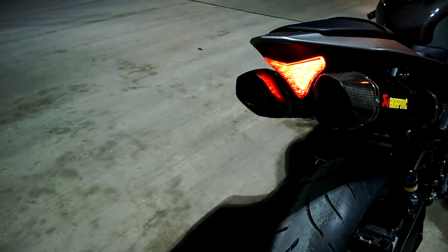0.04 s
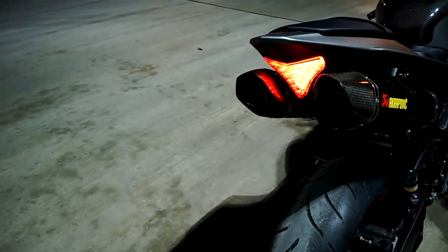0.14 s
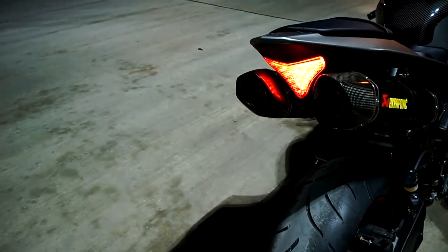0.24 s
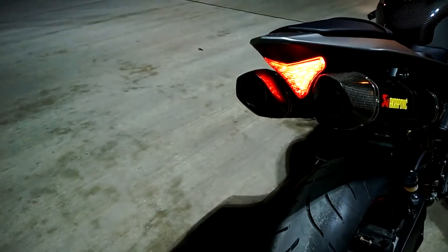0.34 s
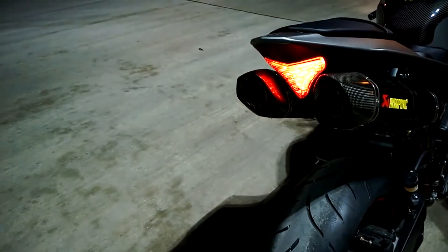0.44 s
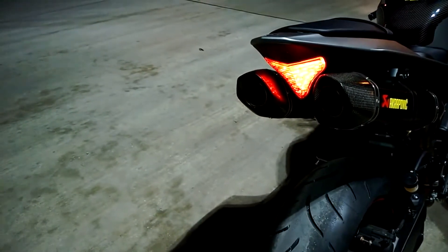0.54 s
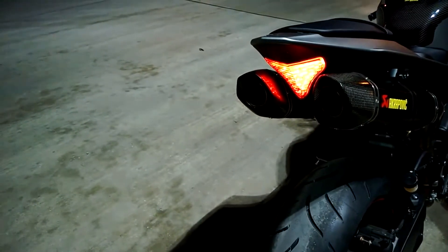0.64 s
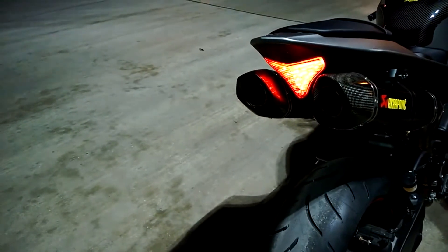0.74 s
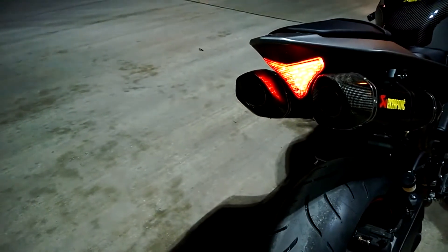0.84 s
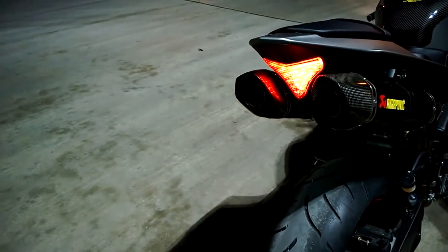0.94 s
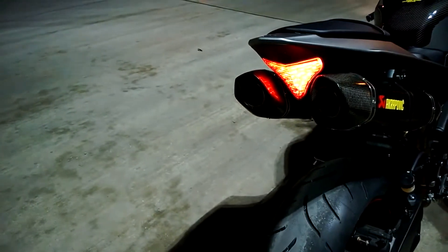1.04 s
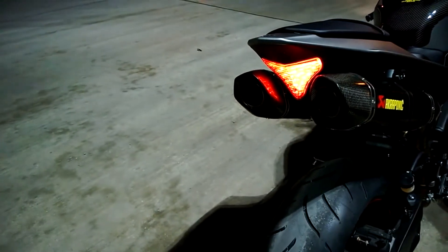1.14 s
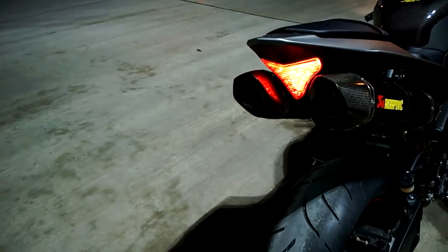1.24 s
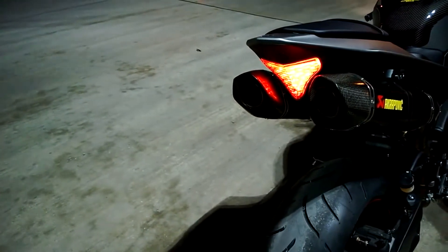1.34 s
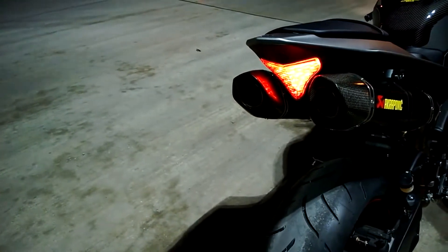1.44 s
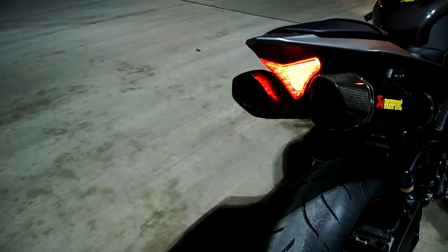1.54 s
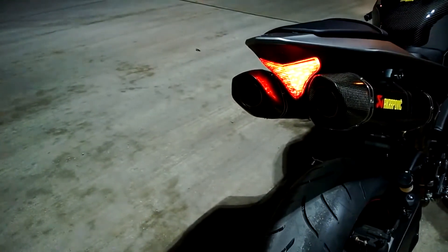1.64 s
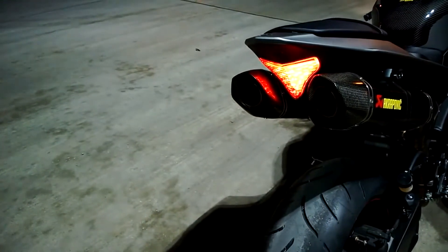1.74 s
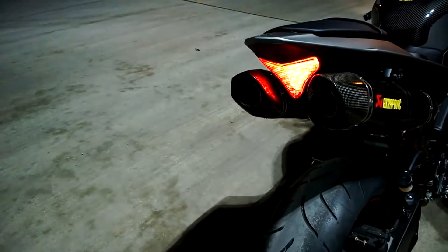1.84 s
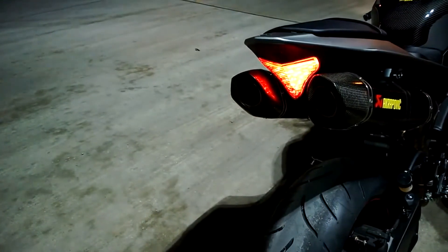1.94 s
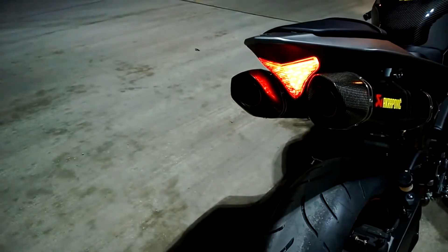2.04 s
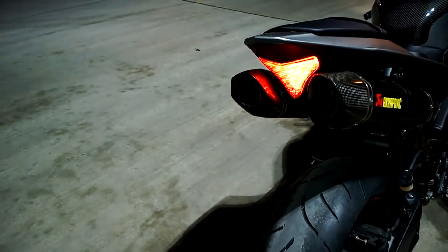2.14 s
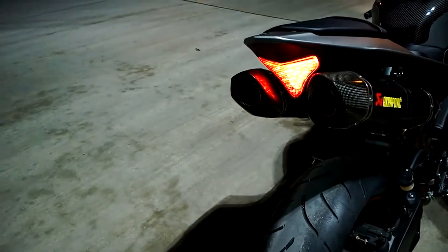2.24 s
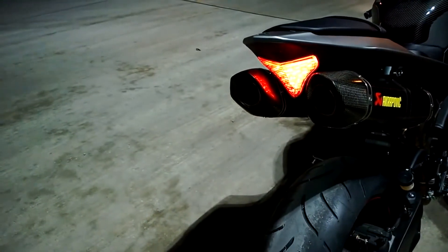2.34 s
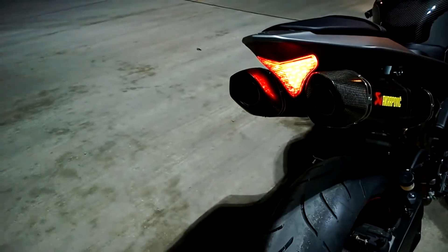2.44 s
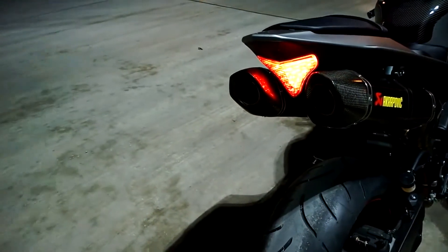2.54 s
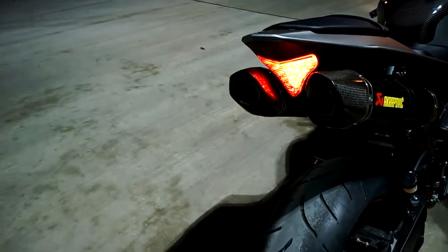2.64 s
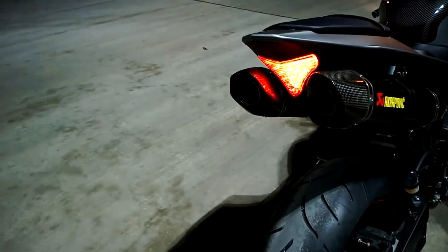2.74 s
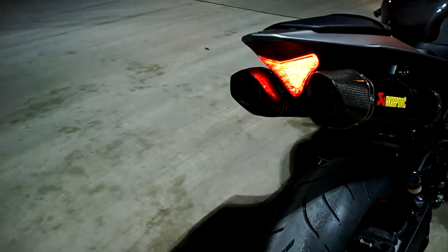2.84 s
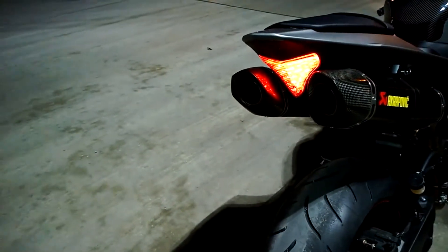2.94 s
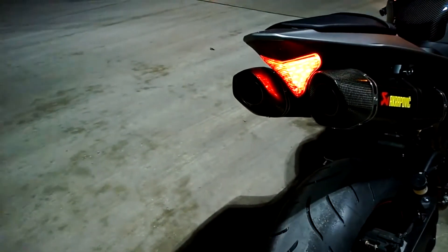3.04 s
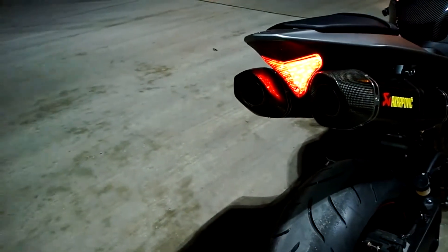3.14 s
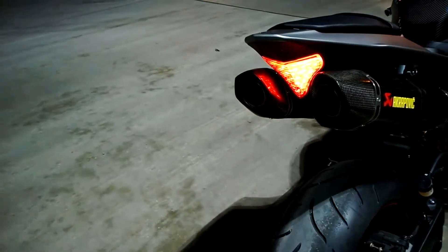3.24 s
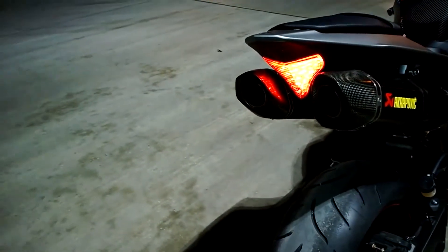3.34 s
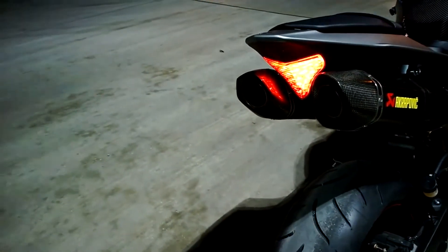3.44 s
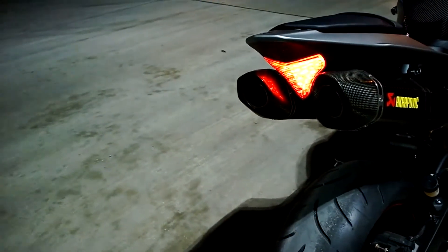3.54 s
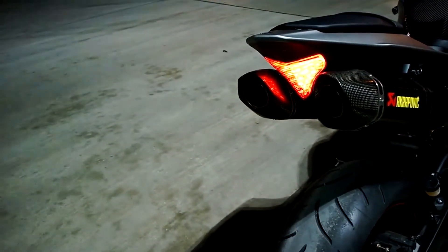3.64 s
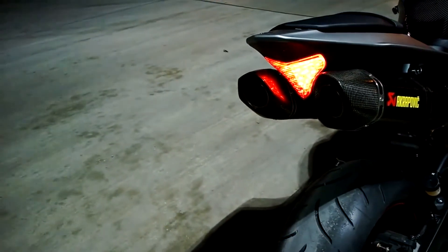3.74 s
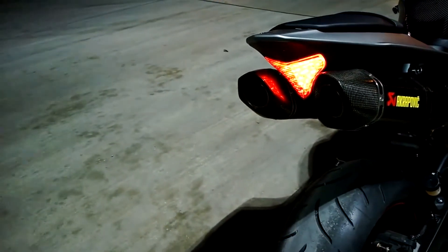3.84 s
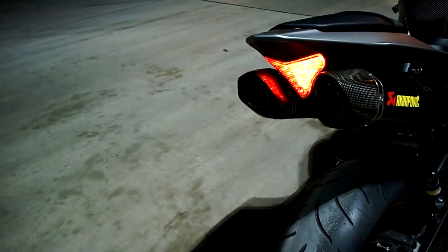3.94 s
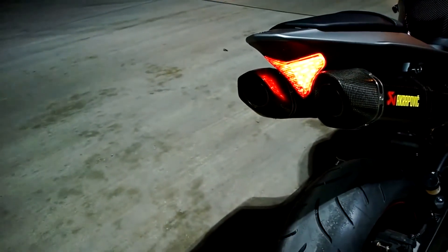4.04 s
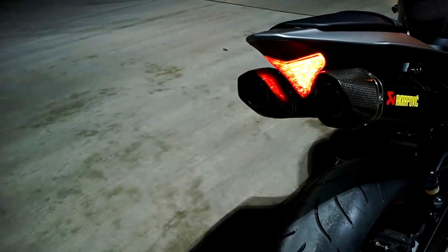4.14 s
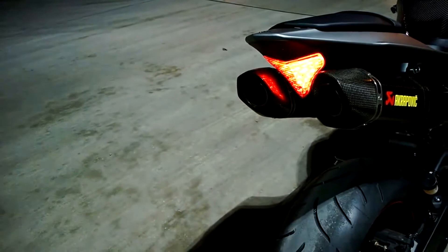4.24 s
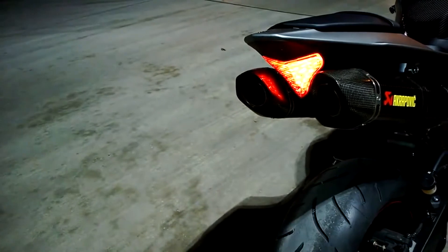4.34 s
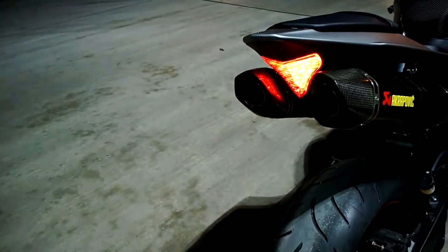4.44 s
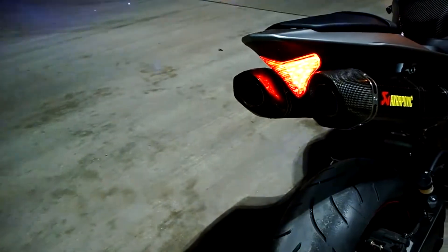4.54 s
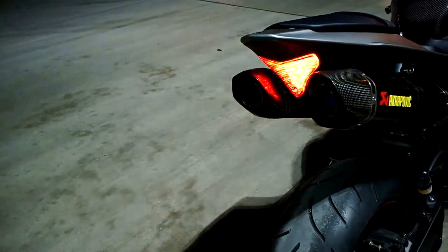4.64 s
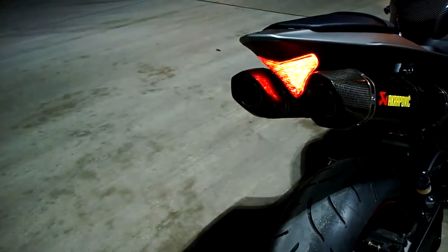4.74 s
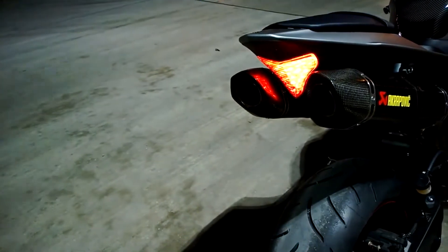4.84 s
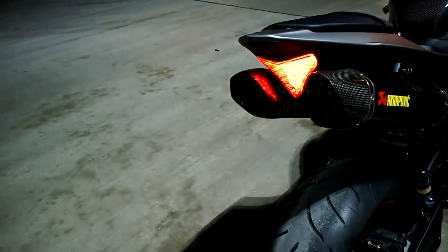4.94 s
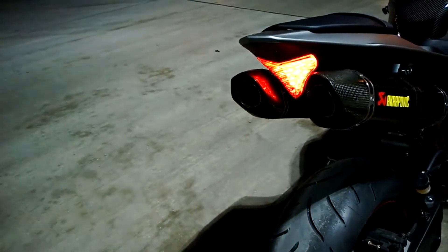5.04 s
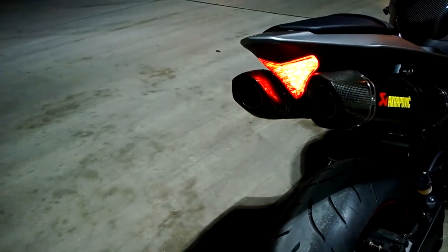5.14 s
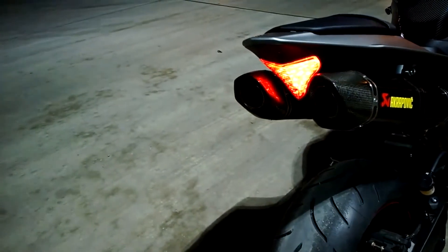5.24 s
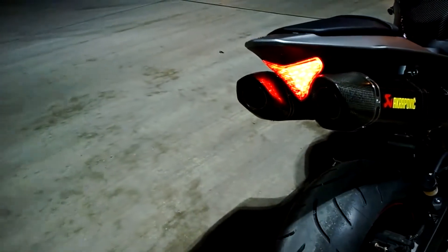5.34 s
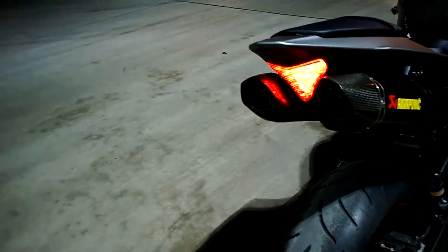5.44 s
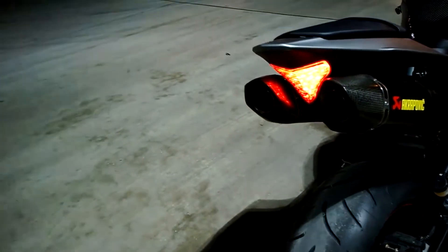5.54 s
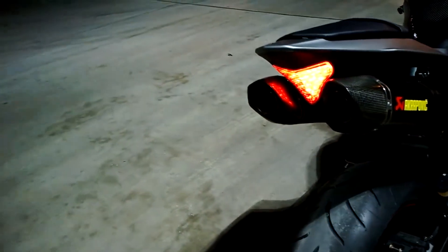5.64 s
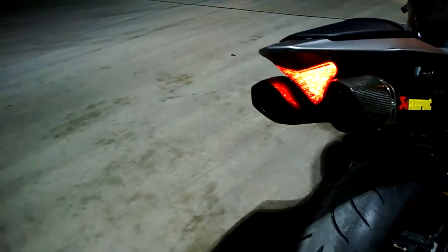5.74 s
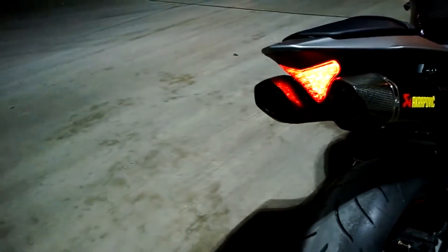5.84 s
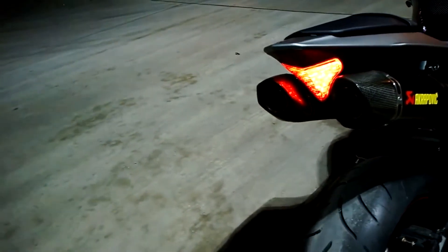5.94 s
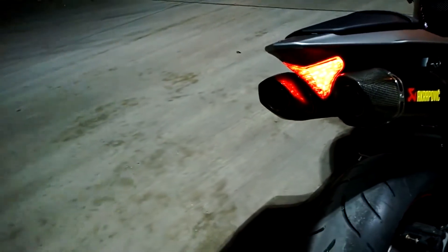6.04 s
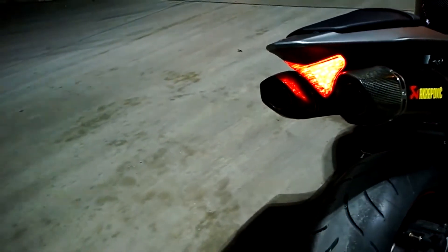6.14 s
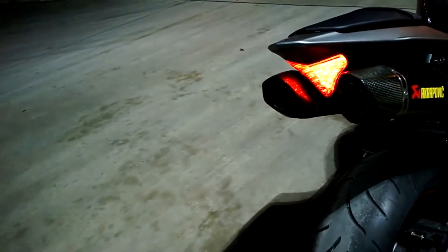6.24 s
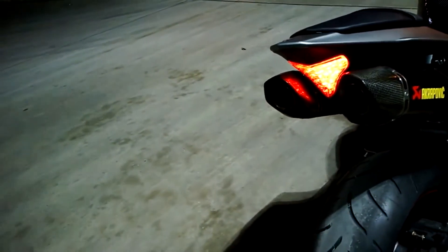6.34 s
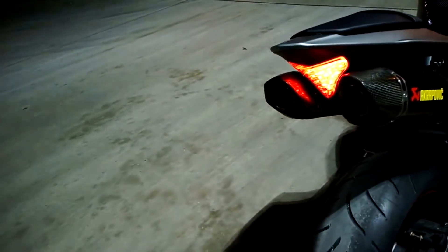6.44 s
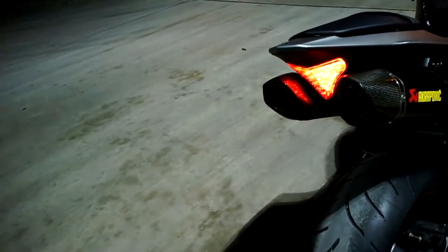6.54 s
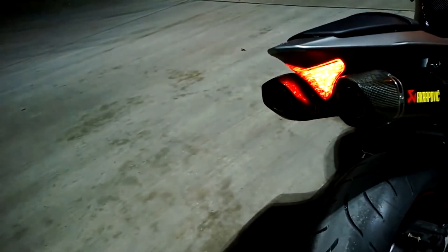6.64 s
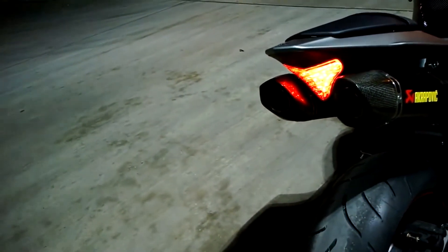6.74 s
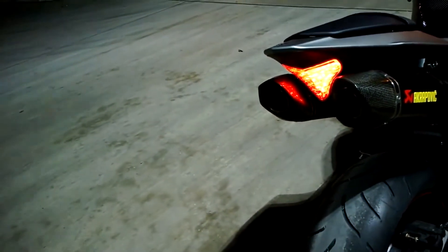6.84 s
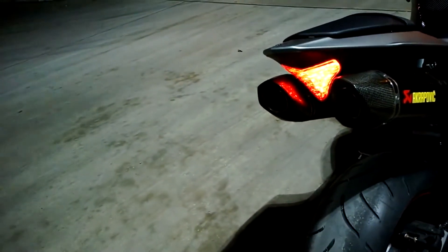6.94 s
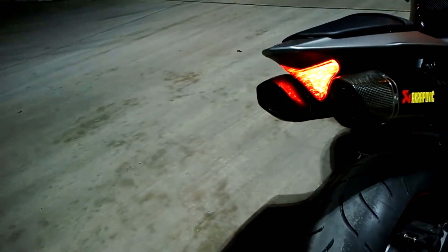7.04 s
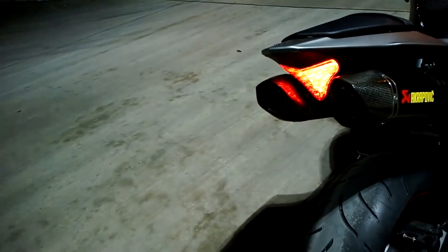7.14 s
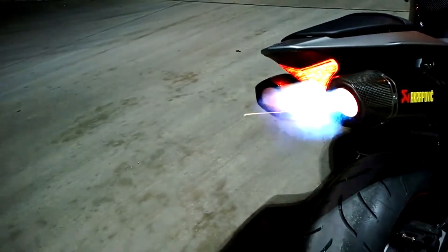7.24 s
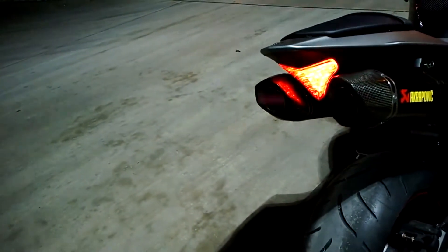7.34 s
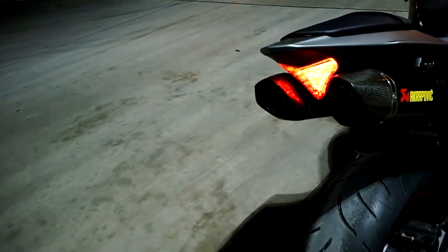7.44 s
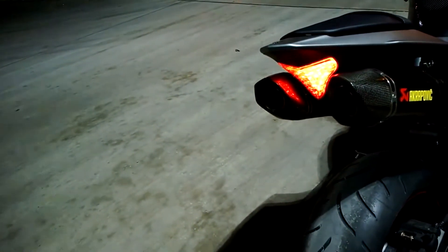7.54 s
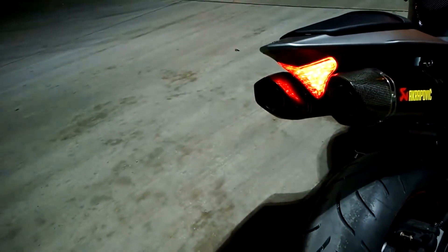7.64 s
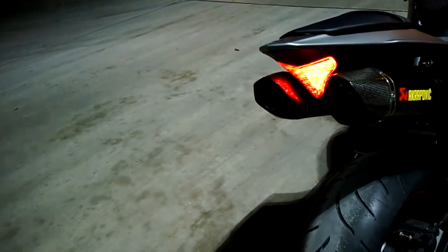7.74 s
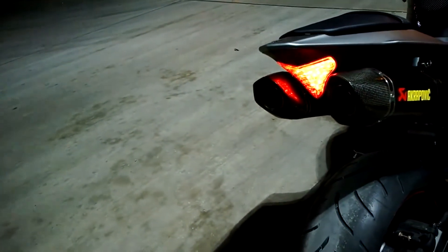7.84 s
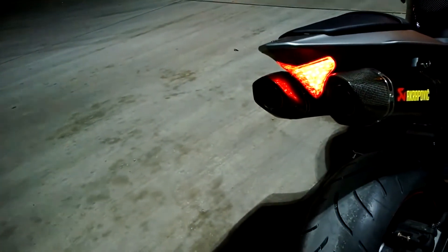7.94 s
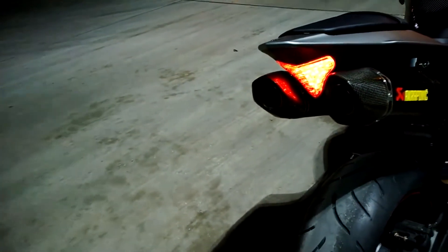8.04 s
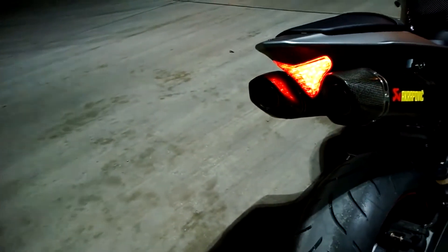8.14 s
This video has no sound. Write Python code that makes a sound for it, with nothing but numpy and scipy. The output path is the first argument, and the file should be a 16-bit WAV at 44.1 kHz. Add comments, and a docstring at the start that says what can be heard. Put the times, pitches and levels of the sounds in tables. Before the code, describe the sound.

A parked sport motorcycle with a loud exhaust is revved three times into its limiter, popping on each run-down to a lumpy idle.

```python
"""Sport motorcycle revved in a yard

A parked motorcycle with an unevenly firing four-cylinder engine is revved three times into its limiter.
Exhaust pulses ring the pipes: a rasp on the throttle, a smooth falling drone and an intake hiss off it.
Unburnt fuel pops in the silencers on the way back down to a lumpy idle; the concrete yard answers faintly."""
import sys
import numpy as np
from scipy import signal
from scipy.fft import rfft, irfft, next_fast_len
from scipy.io import wavfile
from scipy.ndimage import uniform_filter1d

SR = 44100
rng = np.random.default_rng(int(sys.argv[2]) if len(sys.argv) > 2 else 0)


def log_audio(samples):
    """Write samples as a 16-bit WAV file to the path given in sys.argv[1]."""
    # one column per channel
    frames = np.atleast_2d(samples).T
    # limit to full scale, then quantise
    limited = np.clip(frames, -1, 1)
    pcm = np.round(limited * 32767).astype(np.int16)
    wavfile.write(sys.argv[1], SR, pcm)


N = 361179
TIME = np.arange(N) / SR  # seconds


# How much turbulence is mixed into the rasp. The columns: share when coasting, share added when pulling.
TURBULENCE_SHARE = (.1, .1)


def exhaust(fired, gusts, speed, load, note_db, boom_db, rasp_db, suction=0.96, suction_s=0.00047,
            gurgle=0.52, hoarse_hz=40, rasp_from_hz=30, bark=0.99):
    """Round pulses give the note; their steep fronts and the turbulence behind them give the rasp."""
    swirl = steady(pipe((0.99 + gusts) * rng.standard_normal(N)))
    flow = -puffs(fired, width_s=0.00036, slowing=0.81, sharpening=0.054)
    # under load each pulse is followed by a suction wave from the open pipe end
    flow = flow - suction * load * np.interp(TIME - suction_s, TIME, flow)
    fronts = pipe(-puffs(shocks(fired), width_s=.000026, slowing=0.19, sharpening=0.064))

    # pulling through the middle revs, the fronts bark into the note
    middle_revs = np.exp(-((speed - 58) / 12) ** 2)
    barking = (.12 + bark * middle_revs) * load
    low_gurgle = gurgle / (1 + (speed / 42) ** 6) * cut(swirl, 470, "low", order=2)
    churn = 0.012 * load * swirl + low_gurgle
    low_fronts = steady(fronts - below(fronts, 290))
    body = below(steady(pipe(flow)) + barking * low_fronts + churn, 670)

    deep = below(body, 125)
    note = steady(body - deep) * amp(note_db)
    boom = steady(cut(deep, 46, "high", order=3)) * amp(boom_db)

    sharp_fronts = steady(fronts - below(fronts, 452))
    hoarse = steady(swirl - below(swirl, 452))
    coast_share, pull_share = TURBULENCE_SHARE
    rough = coast_share + pull_share * load + (hoarse_hz / speed) ** 4
    rasp = steady(sharp_fronts + rough * hoarse)
    rasp = rasp / (1 + (rasp_from_hz / speed) ** 3)  # dies away towards idle
    return note + boom + rasp * amp(rasp_db)


# Resonances of the pipes and silencers. Each row: frequency in Hz, width in Hz, relative level in dB.
PIPE_RESONANCES = [(58, 12, 4), (140, 154, 3.5), (244.2, 33.8, 7.5), (365, 36, -2), (470.5, 89, -2.5),
                   (661.3, 38, -8), (903, 89, -5.5), (1192, 88, -14), (1448, 182, -10.5),
                   (1784, 116, -11.5), (2097, 136, -18.5), (3630, 320, -35), (5800, 2900, -45.5)]


def pipe(x, size=8192):
    """Rings the exhaust system: a causal filter with the pipe's resonances."""
    f = abs(np.fft.fftfreq(size, 1 / SR))
    power = sum(amp(db) ** 2 / (1 + ((f - hz) / width) ** 2) ** 2 for hz, width, db in PIPE_RESONANCES)
    log_gain = np.log(power + 1e-9) / 2
    # the phase that makes the ringing start at once and only follow its cause
    response = np.exp(np.conj(signal.hilbert(log_gain)))
    ring = np.fft.ifft(response).real[:size // 2]
    return signal.oaconvolve(x, ring)[:len(x)]


# When the cylinders fire. Each entry: place in the engine cycle, in cycles.
FIRING_PLACES = np.array([0, 3, 5, 6]) / 8
# Pulse strength of each cylinder. Each row: level coasting in dB, level pulling in dB (before a common 3.5 dB cut).
CYLINDER_LEVELS = [(2.5, -2), (0, 5.5), (-3.5, 8), (1.5, 4.5)]


def firings(turns, speed, load, coast_spread_db=0.36, pull_spread_db=.5, slow_spread_db=1.3,
            lumpy_hz=34, stumble=0.014):
    """Time and size of each exhaust pulse; at low speed combustion is uneven in strength and timing."""
    cycles = np.arange(int(turns[-1]) + 1)
    s = np.interp((cycles[:, None] + FIRING_PLACES).ravel(), turns, TIME)
    chance = rng.standard_normal((4000, 2))[:len(s)]
    hz = np.interp(s, TIME, speed)
    # the engine only pulls hard once it has picked up
    pull = np.interp(s, TIME, load) / (1 + (46 / hz) ** 6)
    coast_db, pull_db = np.tile(CYLINDER_LEVELS, (len(cycles), 1)).T
    lumpy = 1 / (1 + (hz / (lumpy_hz * (1 + 1.64 * pull))) ** 8)
    spread_db = coast_spread_db + pull_spread_db * pull + slow_spread_db * lumpy
    mean_db = coast_db * (1 - pull) + (pull_db - 3.5) * pull
    size = amp(mean_db + spread_db * np.clip(chance[:, 0], -2, 2))
    uneven_s = s + stumble * lumpy * chance[:, 1] / (hz + 10)
    return np.transpose([uneven_s, size, hz, pull])[s < TIME[-1]]


# When the rev limiter cuts the sparks; the unburnt charge flares when they return.
# Each row: start in seconds, end in seconds, level of the flare in dB.
LIMITER_CUTS = [(0.989, 1.028, -1), (1.07, 1.104, -2), (3.581, 3.611, 1.5), (3.645, 3.681, 0.5),
                (6.376, 6.42, 0)]


def misfire(fired):
    """During each cut of the limiter and just after, the charges burn with uneven timing and strength."""
    s, size, hz, pull = fired.T
    near_cut = np.max([(s > start) & (s < end + .02) for start, end, _ in LIMITER_CUTS], axis=0)
    ragged = near_cut * (hz > 112)
    shift, strong = np.clip(rng.standard_normal((len(s), 2)), -1.5, 1.5).T
    return np.transpose([s + .0006 * ragged * shift, size * amp(3 * ragged * strong), hz, pull])


# Steep pulse fronts of each cylinder; the headers differ in length and heat.
# Each row: coasting term in dB (weighted by 0.5 minus the pull), pulling term in dB (weighted by the pull),
# delay coasting in seconds, delay pulling in seconds.
CYLINDER_FRONTS = [(-16, -7, 0.001, 0.00026), (-2, -6, 0.00091, .00021), (-3, -6.5, 0, 0.00019),
                   (-2, -3.5, 0.00048, 0.00098)]


def shocks(fired, middle_lead=2.26, top_lead=0.64, even_from_hz=64, even_to_hz=92):
    """Steep fronts with each cylinder's strength and delay; pulling at lower revs, strong ones lead most."""
    s, size, hz, pull = fired.T
    rows = np.array(CYLINDER_FRONTS)[np.arange(len(s)) % len(CYLINDER_FRONTS)]
    coast_db, pull_db, coast_s, pull_s = rows.T
    extra_lead = np.interp(hz, [even_from_hz, even_to_hz], [middle_lead - top_lead, 0])
    lead = top_lead + pull * extra_lead
    strength = size ** lead * amp(coast_db * (0.5 - pull) + pull_db * pull)
    return np.transpose([s + coast_s * (1 - pull) + pull_s * pull, strength, hz, pull])


def puffs(fired, width_s, slowing, sharpening):
    """Bell-shaped gas pulses, shorter at speed; strong ones steepen under load."""
    out, t = np.zeros(N), np.arange(-200, 200) / SR
    for s, size, hz, pull in fired:
        width = width_s * (50 / hz) ** slowing / (1 + sharpening * pull * size)
        late = s - round(s * SR) / SR  # the part of the time that falls between samples
        add(out, s + t[0], size / width * np.exp(-.5 * ((t - late) / width) ** 2))
    return out


# One curve for each twist of the throttle, from opening to closing.
# Each row: time in seconds, engine speed in cycles per second (a cycle is two crank turns).
BLIPS = [
    [(.51, 13.5), (.56, 25), (.68, 44.8), (.75, 61.8), (.85, 81.8), (.97, 112.7), (.993, 117),
     (1.085, 117.5), (1.121, 113)],
    [(2.65, 14.5), (2.74, 26.5), (2.88, 40.2), (2.98, 56), (3.09, 62.5), (3.17, 69.4), (3.51, 106),
     (3.582, 118), (3.66, 117), (3.706, 113.8)],
    [(5.6, 11), (5.78, 31), (5.95, 45.2), (6.05, 56.8), (6.14, 64), (6.2, 72.4), (6.25, 83.5), (6.38, 120),
     (6.44, 116.3)],
]
START_HZ, IDLE_HZ = 31, 11  # engine speed at the start and at idle, cycles per second


def engine_speed():
    """Each blip drives the speed up; in between the engine runs down freely."""
    speed = run_down(0, START_HZ)
    for blip in BLIPS:
        s, hz = np.transpose(blip)
        driven = np.interp(TIME, s, hz)
        speed = np.select([TIME < s[0], TIME < s[-1]], [speed, driven], run_down(s[-1], hz[-1]))
    return speed


# with the throttle shut, drag slows the engine in proportion to its speed and friction at a constant rate
DRAG_S, FRICTION_HZ_PER_S = 1.0, 13


def run_down(start, from_hz):
    """Engine speed after the throttle shuts, falling until the idle holds it."""
    offset = FRICTION_HZ_PER_S * DRAG_S
    return np.maximum((from_hz + offset) * np.exp((start - TIME) / DRAG_S) - offset, IDLE_HZ)


# Loudness by engine speed with the throttle shut. Each row: speed in cycles per second, exhaust note in dB,
# low boom in dB, rasp in dB (before it dies away towards idle), mechanical rush in dB, intake hiss in dB.
COASTING_LEVELS = [(11.5, -42.5, -38, -59, -62.5, -91), (18.8, -42, -33, -83, -61, -87),
                   (30.7, -29.5, -29, -81, -55.5, -74), (38.2, -31, -27, -60, -53.5, -73),
                   (46.5, -23.5, -30.5, -56, -51, -71), (54.8, -25.5, -35.5, -47, -49, -62),
                   (64.2, -24, -36, -42.5, -46.5, -57.5), (77.4, -16, -41, -34, -43, -43),
                   (85, -19, -40, -33.5, -41, -36.5), (105, -21, -38.5, -26.5, -34.5, -42),
                   (114, -21.5, -45, -29, -35, -39.5)]
# The same with the throttle open by a usual twist. Each row: the same columns and units.
PULLING_LEVELS = [(14.4, -32, -30, -61, -54.5, -84), (26, -25.5, -27, -66, -52, -63),
                  (41, -21, -29, -52.5, -48, -68), (60.4, -17, -23.5, -28.5, -43.5, -49.5),
                  (68.9, -19, -18.5, -27.5, -42, -49.5), (89, -15, -26, -21.5, -37.5, -53.5),
                  (100, -16, -21, -19.5, -33, -51.5), (118.6, -14, -20, -18.5, -31, -50.5)]
# A harder twist is louder. The columns, in dB per doubling of the acceleration: note, boom, rasp, rush, hiss.
EFFORT_DB = (3.3, 2, 3.9, 3.2, 11)
USUAL_HZ_PER_S = 166  # acceleration of a usual twist
WIDE_OPEN_HZ = 89.5  # around this speed the effect of a harder twist fades out


def levels(speed, load, response_s=0.0046):
    """The level of each layer in dB, from engine speed, load and how hard the engine accelerates."""
    def at_speed(table):
        hz, *columns = np.transpose(table)
        return np.array([np.interp(speed, hz, db) for db in columns])

    coast, pull = at_speed(COASTING_LEVELS), at_speed(PULLING_LEVELS)
    acceleration = np.maximum(smooth(np.gradient(speed) * SR, .04), 40)
    effort = np.log2(acceleration / USUAL_HZ_PER_S) / (1 + (speed / WIDE_OPEN_HZ) ** 8)
    return coast + smooth(load, response_s) * (pull + np.outer(EFFORT_DB, effort) - coast)


# Valve gear and turbulent gas. Each row: frequency in Hz, relative level in dB per Hz.
RUSH_SPECTRUM = [(300, -3.5), (650, 6), (1100, 7.5), (1700, 5.5), (2100, -3.5), (2400, -9.5), (2900, -4.5),
                 (3450, -2.5), (4100, -6.5), (4900, -16), (6200, -16), (8000, -23.5), (12000, -19.5),
                 (16000, -44)]
# Air squeezing past the throttle plates. Each row: frequency in Hz, relative level in dB per Hz.
INTAKE_SPECTRUM = [(3000, -41.5), (7000, -13.5), (9500, -13), (11500, -5), (13000, 3.5), (14000, 2),
                   (15000, 2.5), (16000, -17.5)]


def air(fired, gusts, speed, rush_db, hiss_db, rush_throb=0.09, hiss_throb=6.6):
    """Rush and intake hiss throb with the cylinders; at speed the rush thins to a pitched metallic buzz."""
    rush = noise(RUSH_SPECTRUM)
    rush = rush - np.interp(speed, [10, 75], [0, .75]) * below(rush, 2300)
    clicks = puffs(shocks(fired), width_s=.00002, slowing=0, sharpening=0)
    buzz = cut(coloured(clicks, RUSH_SPECTRUM), 1900, "high")
    pitched = np.interp(speed, [50, 90], [0, .5])
    throbbing = steady(rush * (1 + rush_throb * gusts))
    rush = steady((1 - pitched) * throbbing + pitched * steady(buzz))
    hiss = steady(noise(INTAKE_SPECTRUM) * (1 + hiss_throb * gusts))
    return rush * amp(rush_db) + hiss * amp(hiss_db)


# Afterfire in the silencers. Each row: start in seconds, blast strength in dB before filtering,
# blast time scale in seconds, crack strength in dB relative to the blast.
POPS = [(0.095, -30, 0.0012, -17), (1.911, -5.5, 0.001, -26), (1.985, -13.5, 0.0021, -22.5),
        (2.119, -21, .0006, -15.5), (2.283, -39, .0008, -22), (2.404, -22.5, 0.00047, -20),
        (4.527, -11, 0.0012, -22), (4.5456, -1.5, 0.00037, -16), (4.547, -1, 0.00081, -36),
        (4.721, -28, 0.00087, -31), (4.837, -25.5, 0.00048, -18), (5.138, -33, 0.00065, -21),
        (7.282, -21, 0.0014, -29), (7.303, -9, 0.00093, -24.5), (7.383, -12, 0.0017, -18.5)]
# The throttle snaps shut with a spit of air. Each row: start in seconds, level in dB before filtering,
# decay in seconds.
SPITS = [(1.129, -11.5, 0.0013)]


def afterfire(crack_s=0.0043, thump_db=2, ring_db=6, crack_db=4, spit_hz=9500):
    """Each pop is a short blast that rings the pipe, with a crack of hot gas; a spit is hissing noise."""
    t = np.arange(3000) / SR
    blasts, cracks, spits = np.zeros((3, N))
    for s, db, length, gas_db in POPS:
        u = t / length
        add(blasts, s, amp(db) * (1 - u) * np.exp(-u))
        add(cracks, s, amp(db + gas_db) * np.exp(-t / crack_s) * rng.standard_normal(len(t)))
    for s, db, decay in SPITS:
        add(spits, s, amp(db) * np.exp(-t / decay) * rng.standard_normal(len(t)))
    thump = cut(cut(blasts + 3 * cracks, 540, "low", order=3), 390, "high", order=2)
    ring = pipe(blasts + cracks)
    crack = cut(cracks, 2050, "low", order=4) + 0.095 * cracks
    pops = amp(thump_db) * thump + amp(ring_db) * ring + amp(crack_db) * crack
    return pops + cut(spits, spit_hz, "high")


DIP_DB, DIP_S, DIP_DELAY_S = -6, 0.015, 0.031  # depth for a pop of 0 dB, time scale, delay of the lowest point


def dips():
    """The level of the exhaust layers dips briefly around each pop, in dB: deeper for a stronger pop."""
    return sum(DIP_DB * amp(db) ** 2 * np.exp(-((TIME - s - DIP_DELAY_S) / DIP_S) ** 2)
               for s, db, *_ in POPS)


def yard(x, wet_db=-25.02, t60=0.61, dull_hz=3500):
    """Sparse, dull reflections from the ground and distant walls."""
    t = np.arange(SR // 2) / SR
    sparse = rng.random(len(t)) < 2000 / SR  # about 2000 reflections a second
    taps = rng.standard_normal(len(t)) * sparse * (t > .008)
    tail = cut(taps * amp(-60 * t / t60), dull_hz, "low", order=1)
    return x + amp(wet_db) * signal.oaconvolve(x, tail / np.linalg.norm(tail))[:N]


def amp(db):
    """Decibels to gain."""
    return 10 ** (np.asarray(db) / 20)


def add(mix, s, sound):
    """Mixes a sound in at a time in seconds."""
    part = mix[max(round(s * SR), 0):][:len(sound)]
    part += sound[:len(part)]


def smooth(x, seconds):
    """Moving average, taken twice."""
    size = max(int(seconds * SR), 1)
    return uniform_filter1d(uniform_filter1d(x, size), size)


def steady(x):
    """Unit level over about one idle cycle; faster throbs stay."""
    return x / np.sqrt(abs(smooth(x * x, .09)) + 1e-14)


def between(start, end, ramp_s=0.001):
    """One inside a span of time and zero outside, with soft edges."""
    return smooth(np.clip(np.minimum(TIME - start, end - TIME) * SR, 0, 1), ramp_s)


def cut(x, hz, kind, order=4):
    """Low-pass or high-pass filter."""
    return signal.sosfilt(signal.butter(order, hz, kind, fs=SR, output="sos"), x)


def below(x, hz, order=5):
    """The part of a sound under a frequency, with no delay."""
    return signal.sosfiltfilt(signal.butter(order, hz, fs=SR, output="sos"), x)


def coloured(x, spectrum):
    """A sound shaped by a spectrum, at unit level."""
    hz, db = np.transpose(spectrum)
    size = next_fast_len(N, True)
    log_hz = np.log(np.fft.rfftfreq(size, 1 / SR) + 1)
    gain = amp(np.interp(log_hz, np.log(hz), db))
    x = irfft(rfft(x, size) * gain, size)[:N]
    return x / x.std()


def noise(spectrum):
    """Unit noise with a given spectrum."""
    return coloured(rng.standard_normal(N), spectrum)


CUT_DB = 1.5  # the exhaust during a cut, against plain coasting
FLARE_S, OPENING_S = .028, 0.051  # length of the flare after a cut; time the throttle takes to open


def scene():
    """Speed and load drive every layer of the engine; the limiter chops the exhaust."""
    speed = engine_speed()
    no_spark = sum(between(start, end) for start, end, _ in LIMITER_CUTS)
    flare_db = sum(db * between(end, end + FLARE_S, .004) for _, end, db in LIMITER_CUTS)
    throttle = np.zeros(N)
    for blip in BLIPS:
        opens, closes = blip[0][0], blip[-1][0]
        throttle += between(opens, closes) * np.clip((TIME - opens) / OPENING_S, 0, 1)
    load = np.clip(throttle - no_spark, 0, 1)

    note_db, boom_db, rasp_db, rush_db, _ = levels(speed, load)
    hiss_db = levels(speed, throttle)[-1]  # the intake follows the throttle, spark or no spark
    turns = np.cumsum(speed) / SR  # engine cycles so far
    fired = misfire(firings(turns, speed, load))
    gas = puffs(shocks(fired), width_s=0.00018, slowing=0.74, sharpening=0.36)
    gusts = steady(cut(gas, 120, "low", order=1))

    pipes = exhaust(fired, gusts, speed, load, note_db, boom_db, rasp_db)
    pipes = pipes * amp(CUT_DB * no_spark + flare_db + dips())
    return yard(pipes + air(fired, gusts, speed, rush_db, hiss_db) + afterfire())[None]


def record(dry):
    """The microphone rounds off the loudest peaks; then the treble is cut off at the band limit."""
    rounded = dry / (1 + (dry / .56) ** 6) ** (1 / 6)
    band_limit = signal.firwin(511, 15900, window=("kaiser", 9), fs=SR)  # Hz
    return signal.oaconvolve(rounded, band_limit[None], "same")


dry = scene()
out = record(dry)
log_audio(out)
```